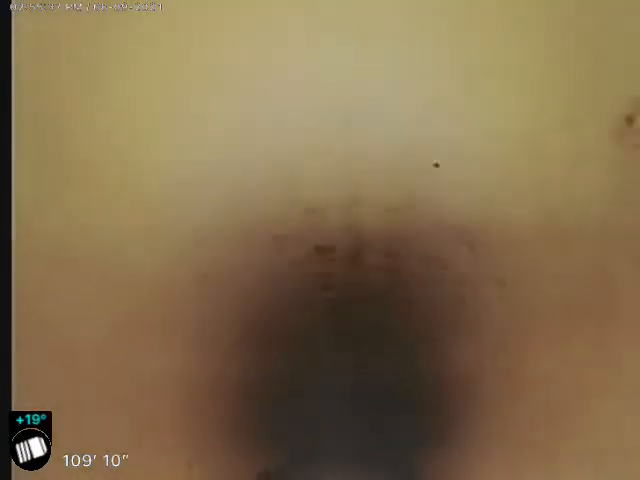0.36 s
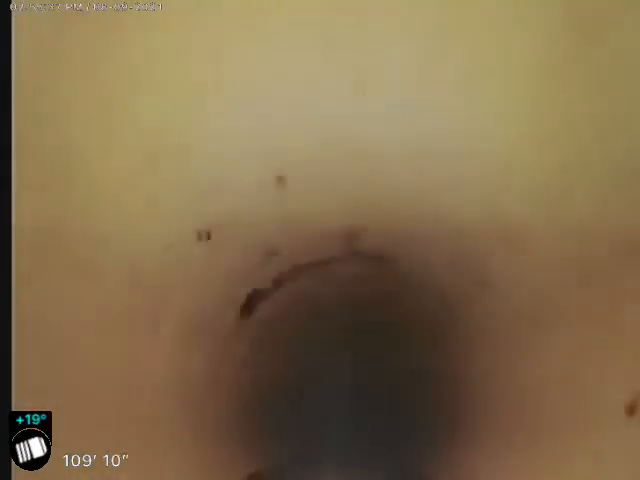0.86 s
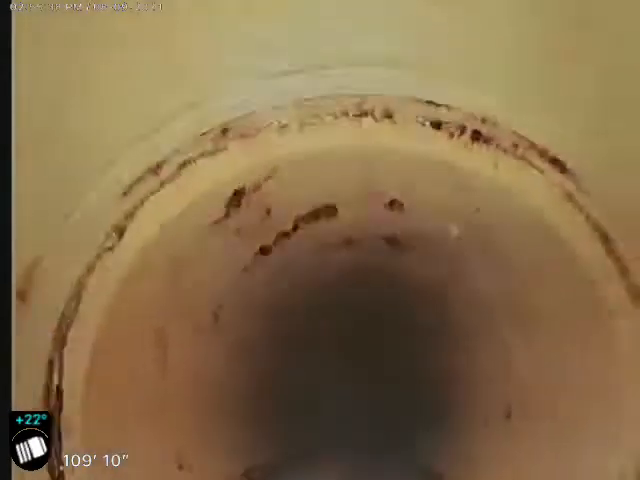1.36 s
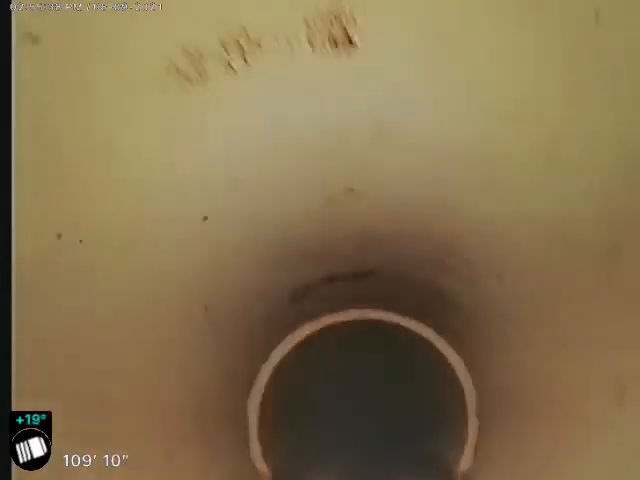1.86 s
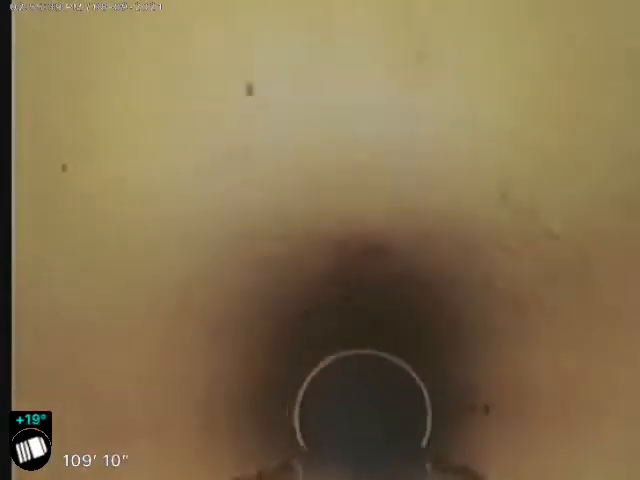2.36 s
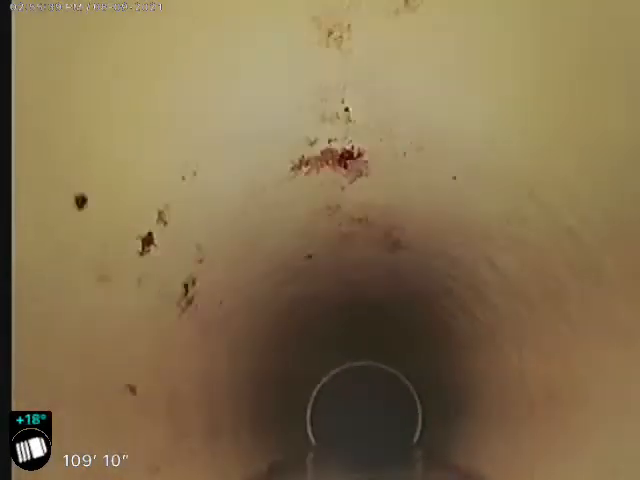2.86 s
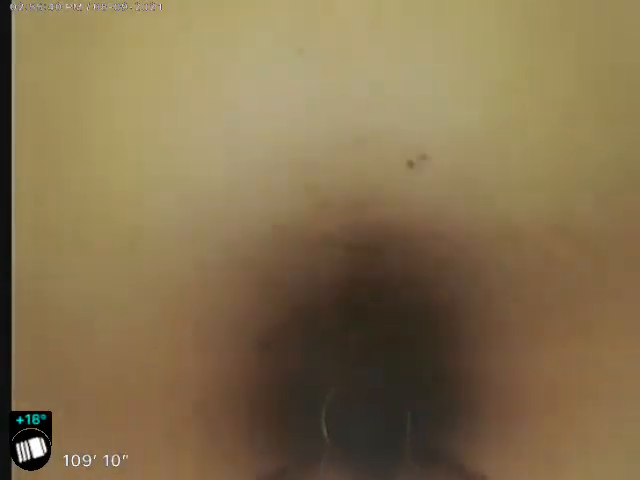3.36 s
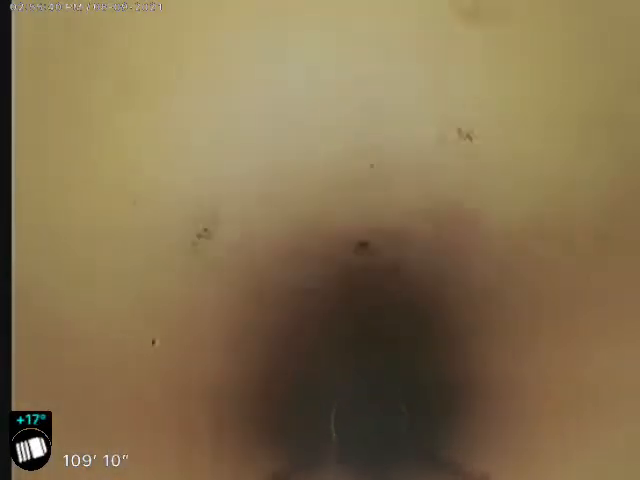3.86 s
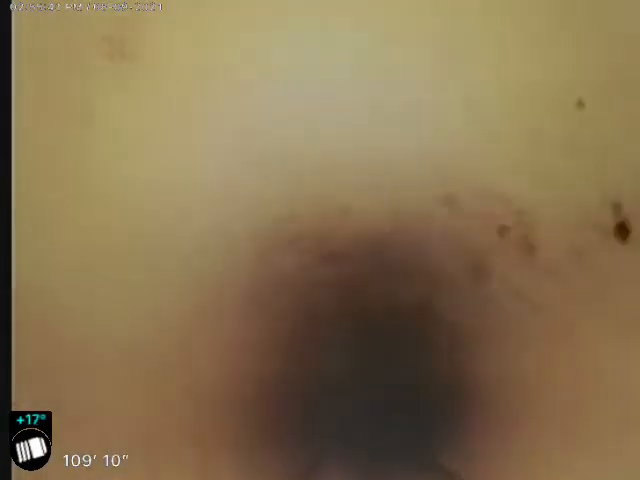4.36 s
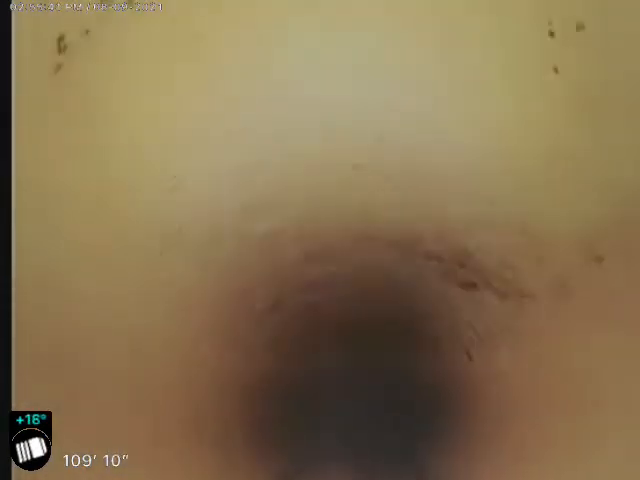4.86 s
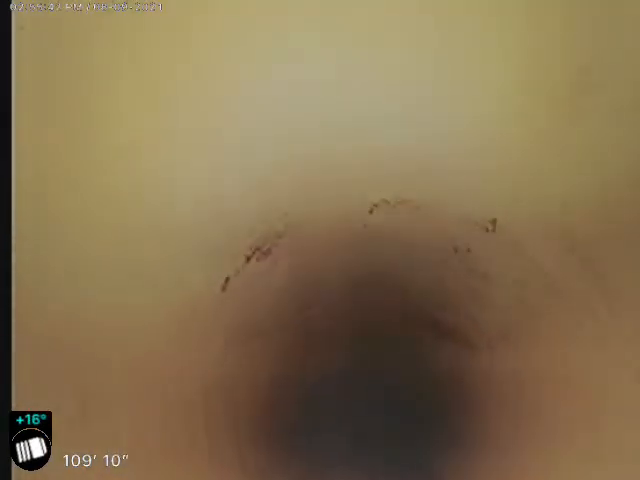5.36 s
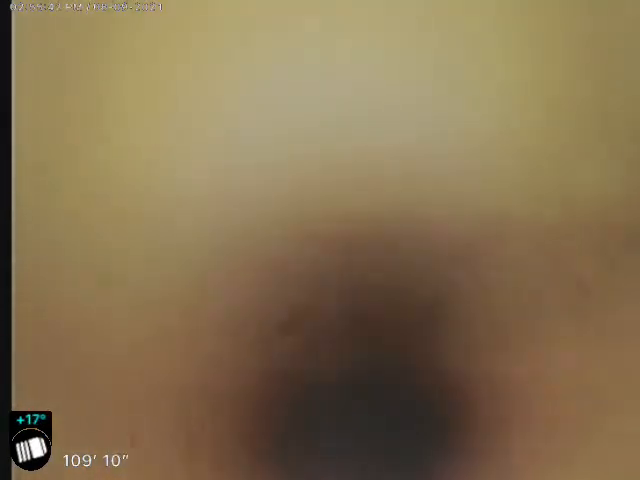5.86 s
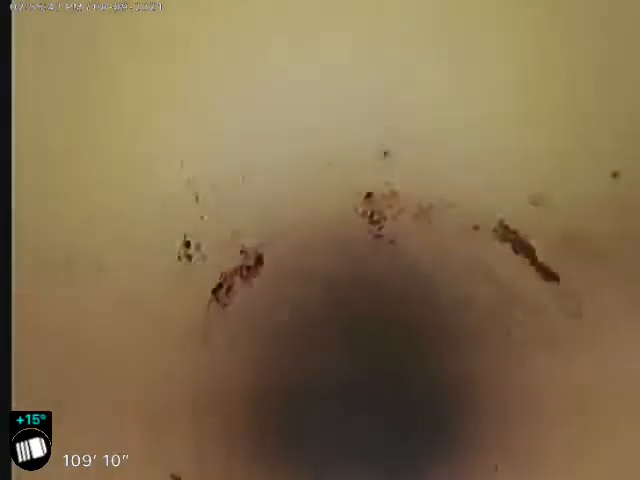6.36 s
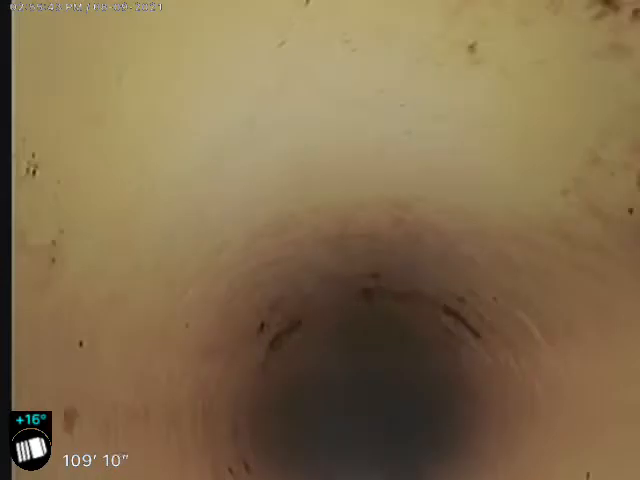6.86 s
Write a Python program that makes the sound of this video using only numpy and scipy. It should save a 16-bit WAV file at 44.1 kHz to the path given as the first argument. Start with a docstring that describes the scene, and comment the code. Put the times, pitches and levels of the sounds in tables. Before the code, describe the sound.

A four-cylinder engine runs at a fast, perfectly even idle close by, a loud low hum with airy roar, faint gear whine and light valve clatter.

```python
"""Close beside a four-cylinder engine at a fast, very even governed idle, on a small camera microphone.
Broad air noise roars in the bodywork and low noise rumbles in hollow modes; a pump drones on its own shaft.
Locked to the crank are the exhaust orders and gear whines, as sines, and valve clatter, as one repeated cycle.
A loose tappet rings once a cycle. Three times the recorder loses a sample and ticks."""
import sys
import numpy as np
from scipy import signal
from scipy.fft import rfft, irfft
from scipy.io import wavfile
from scipy.ndimage import map_coordinates

SR = 44100
rng = np.random.default_rng(int(sys.argv[2]) if len(sys.argv) > 2 else 0)


def decibels_to_gain(level_db):
    """Convert a level in decibels to a linear amplitude gain (20 dB per decade)."""
    exponent = np.asarray(level_db, float) / 20
    return 10 ** exponent


def int16_out(signal):
    """Quantize to a 16-bit WAV file."""
    q = np.round(np.clip(np.atleast_2d(signal).T, -1, 1) * 32767)
    wavfile.write(sys.argv[1], SR, q.astype(np.int16))


N = 308700
TIME = np.arange(N) / SR  # s
HZ = np.maximum(np.fft.rfftfreq(N, 1 / SR), 1)
CYCLE_HZ = 14.4196  # one cycle is two crank turns, four firings

# Air roar before the bodywork colours it: [f/Hz, level/dB per Hz]
AIR_ROAR = [(8, -67.5), (20, -65), (30, -58), (42, -50), (75, -48.5), (95, -56), (130, -57), (240, -64.5),
            (420, -69.5), (600, -70.5), (1000, -76.5), (1400, -79.5), (1700, -77), (2100, -81.5),
            (3000, -80), (4200, -85.5), (5500, -87), (6000, -91), (6500, -87), (6800, -87.5), (7200, -98)]
# Bodywork resonances and dips in the roar: [f/Hz, width/Hz, gain/dB]
BODY_MODES = [(41, 5, 4.5), (61.4, 3.9, -1.5), (69.4, 2.3, -2.5), (74, 6, 1.5), (86, 6.7, -3.5),
              (553.6, 21, 8.5), (96, 8.7, -5), (132, 9, -3.5), (275, 14, -6.5), (697, 44, 3.5),
              (816, 20, -11.5), (1195, 51, 7.5), (1360, 45, -3.5), (1990, 100, -1.5), (2350, 92, -4),
              (2910, 140, -9), (3230, 200, 2), (4600, 150, -3.5), (4830, 390, 3.5)]
# Hollow modes of the rumble in a low, a middle and a high group: [f/Hz, width/Hz, level within group/dB]
HOLLOW_MODES = [
    [(146.5, 10, -4), (165.4, 7.1, 3)],
    [(191.6, 11, 0), (209.9, 12, 1), (234.2, 11, -6.5)],
    [(294, 11, 1.5), (311.4, 10, -2), (332.4, 6.1, -3.5), (385.6, 10, 0.5), (409.8, 15, -1),
     (437, 37, -1.5), (457, 8.1, -4), (472.4, 5.8, 4.5), (496, 14, -6.5)],
]
# Rms of each hollow group before its swell: [level/dB]
HOLLOW_LEVELS = [-39, -39.5, -42.5]
# Swell of the low and middle hollow groups: [t/s, level/dB]
LOWER_SWELL = [(0, 2.5), (.35, -5.5), (1.15, -5.5), (1.67, 4), (2.2, -0.5), (2.999, -2.5), (3.3, 0),
               (4.1, 4.5), (4.6, -2), (5.22, 3.5), (5.9, -0.5), (6.299, 1.5), (7, -5.5)]
# Swell of the high hollow group: [t/s, level/dB]
HIGH_SWELL = [(0, 1), (.4, -3.5), (1.199, 1), (1.7, 2), (2.4, -2), (2.7, -1), (3.0, 1), (3.5, 2),
              (4.0, 3.5), (4.65, -1), (5.3, 3.5), (5.8, -2), (6.2, -1.5), (7, 0)]
# Pump drone partials: [multiple of the pump rate, rms level before wavering/dB]
PUMP_PARTIALS = [(1, -44.5), (2, -47.5), (3, -49.5)]
# Hardest tappet knocks: [cycle number from 0, starting level of the ring/dB]
HARD_TAPS = [(20, -34), (30, -33), (33, -31), (59, -35), (61, -32), (64, -35), (70, -30), (72, -35),
             (75, -33)]
# Valve knocks once a cycle: [lowest multiple, multiple above the highest, crank angle/rad, smear/rad]
VALVE_KNOCKS = [(105, 135, 2.54, 1.0), (235, 350, 3.6, 1.6)]
# Clatter that repeats every cycle: [f/Hz, mean rms level of one cycle harmonic/dB]
CLATTER_SPECTRUM = [(560, -68.5), (650, -67), (740, -66.5), (790, -73), (815, -86.5), (850, -72),
                    (970, -66), (1180, -68), (1350, -76), (1600, -72.5), (2100, -79), (2700, -73.5),
                    (3400, -79), (4100, -80), (5000, -87)]
# Gear and block tones locked to the crank: [multiple of the cycle, rms level before wavering and rise/dB]
GEAR_WHINES = [(41, -61.5), (44, -59.6), (46, -59.0), (47, -59.7), (48, -55.5), (49, -54.6), (50, -52.4),
               (60, -61.4), (64, -59.4), (69, -62.7), (76, -62.6), (83, -63.2), (84, -62.5), (95, -66.7),
               (112, -65.3), (113, -67.6), (118, -62.3), (120, -53.5), (123, -64.8), (128, -56.6),
               (130, -65.8), (133, -67.8), (154, -64.5), (156, -70.8), (162, -71.4), (172, -64.3),
               (180, -66.4), (181, -68.2), (188, -66.8), (200, -68.1), (208, -68.1), (211, -69.4),
               (215, -63.2), (216, -60.4), (219, -68.8), (220, -62.2), (224, -62.8), (225, -65.0),
               (226, -66.3), (227, -62.0), (232, -68.5), (240, -71.5), (255, -72), (260, -72.5), (283, -75)]
# Exhaust tones: [multiple of the cycle, rms level/dB]
EXHAUST_ORDERS = [(2, -52), (3, -44), (4, -16.0), (5, -36.5), (6, -55), (7, -50.5), (8, -37), (10, -46),
                  (11, -49), (12, -38), (14, -53), (15, -54), (16, -58.5), (17, -60.5), (18, -51.5),
                  (19, -67.5), (24, -56), (25, -55), (26, -60), (27, -64), (28, -55), (31, -62), (34, -60),
                  (35, -66), (36, -65.5), (37, -67), (38, -51.5), (40, -61.5)]
# Samples lost by the recorder: [t/s]
LOST_SAMPLES = [2.25839, 3.58200, 4.88238]


def colour(table, hz):
    """Level in dB from a (f/Hz, level/dB) table, straight on a log-frequency axis."""
    points, db = np.transpose(table)
    return np.interp(np.log(hz), np.log(points), db)


def noise(gain):
    """White noise of 0 dB per Hz through a spectral gain."""
    white = rfft(rng.standard_normal(N))
    return irfft(white * gain, N) * np.sqrt(SR / 2)


def walk(rate_hz):
    """Slow chance with spread 1, drawn 100 times a second and joined by straight lines."""
    count = N // 441
    slow = np.exp(-(np.fft.rfftfreq(count, N / count / SR) / rate_hz) ** 2)
    x = irfft(rfft(rng.standard_normal(count)) * slow, count)
    return np.interp(TIME, np.linspace(0, TIME[-1], count), (x - x.mean()) / np.std(x))


def tones(table, phase, start, waver_db, waver_hz):
    """Sines on multiples of a phase, each wavering in level by itself."""
    out = 0
    for (multiple, db), offset in zip(table, start):
        level = np.sqrt(2) * decibels_to_gain(db + waver_db * walk(waver_hz))
        out = out + level * np.cos(round(multiple) * phase + offset)
    return out


def roar(crank):
    """Broad air noise coloured by the bodywork; bands flicker alone and the upper ones pulse with the cycle."""
    body_db = sum(gain / (1 + (2 * (HZ - f) / width) ** 2) for f, width, gain in BODY_MODES)
    gain = decibels_to_gain(colour(AIR_ROAR, HZ) + body_db)
    half_octave = 2 * np.log2(HZ / 40)
    # firing, cycle and valve rates
    pulse_db = 0.32 * np.cos(4 * crank) + 0.34 * np.cos(crank) + 0.38 * np.cos(8 * crank)
    out = 0
    for band in range(-2, 17):
        share = np.cos(np.pi / 2 * np.clip(half_octave - band, -1, 1))
        upper = band > 8  # centred at 905 Hz and above
        flicker_db = (0.7 if upper else 0.9) * walk(1.9)
        out = out + noise(gain * share) * decibels_to_gain(flicker_db + upper * pulse_db)
    return out


def rumble():
    """Low noise ringing in hollow modes; the lower groups swell together, the high one apart; each flickers."""
    out = 0
    swells = [LOWER_SWELL, LOWER_SWELL, HIGH_SWELL]
    for modes, level_db, swell in zip(HOLLOW_MODES, HOLLOW_LEVELS, swells):
        power = sum(decibels_to_gain(2 * db) / (1 + (2 * (HZ - f) / width) ** 2) ** 2 for f, width, db in modes)
        ringing = noise(np.sqrt(power))
        swell_db = np.interp(TIME, *np.transpose(swell))
        flicker_db = 1.0 * walk(3.6)
        out = out + ringing / np.std(ringing) * decibels_to_gain(level_db + swell_db + flicker_db)
    return out


def pump():
    """A drone on its own shaft whose partials waver, each by itself."""
    shaft = 2 * np.pi * 184.4 * TIME  # pump rate in Hz
    start = rng.uniform(0, 2 * np.pi, len(PUMP_PARTIALS))
    return tones(PUMP_PARTIALS, shaft, start, waver_db=3.0, waver_hz=0.72)


def tappet():
    """A loose tappet: one short damped ring a cycle, each with its own strength and pitch."""
    first_s, ring_hz, t60_s = .0283, 1130, .028
    usual_db, scatter_db, pitch_scatter = -39, 3, .07
    hard = dict(HARD_TAPS)
    out, ring_time = np.zeros(N + SR), TIME[:SR // 20]
    chance = rng.standard_normal((int(TIME[-1] * CYCLE_HZ), 2))
    for cycle, (size, pitch) in enumerate(chance):
        db = hard.get(cycle, usual_db + scatter_db * size)
        hz = ring_hz * (1 + pitch_scatter * pitch)
        ring = decibels_to_gain(db - 60 * ring_time / t60_s) * np.sin(2 * np.pi * hz * ring_time)
        at = int((first_s + cycle / CYCLE_HZ) * SR)
        out[at:at + len(ring)] += ring
    return out[:N]


def knocking(multiples):
    """Start phases: random, but gathered round the crank angle of a valve knock where one rings."""
    k = np.asarray(multiples)
    start, spread = rng.uniform(0, 2 * np.pi, len(k)), rng.standard_normal(len(k))
    for low, high, angle, smear in VALVE_KNOCKS:
        start = np.where((k >= low) & (k < high), smear * spread - k * angle, start)
    return start


def clatter(crank):
    """One cycle of random ticks and knocks, read off by crank angle so it repeats, with a slow level waver."""
    k = np.arange(41, 350)  # multiples of the cycle
    lines = np.zeros(4097, complex)
    level = decibels_to_gain(colour(CLATTER_SPECTRUM, k * CYCLE_HZ) + 3.0 * rng.standard_normal(len(k)))
    lines[k] = np.sqrt(2) * level * np.exp(1j * knocking(k))
    lines[[multiple for multiple, db in GEAR_WHINES]] = 0  # those multiples belong to the whines
    size = 2 * (len(lines) - 1)
    cycle = irfft(lines) * size / 2
    place = crank / (2 * np.pi) * size % size
    return map_coordinates(cycle, [place], order=3, mode="grid-wrap") * decibels_to_gain(0.37 * walk(1.5))


def whine(crank):
    """Gear and block tones on crank multiples, wavering one by one; the upper ones slowly grow."""
    upper_from, rise_db_per_s = 200, 0.9  # whines above this multiple grow
    groups = []
    for high in (False, True):
        table = [row for row in GEAR_WHINES if (row[0] > upper_from) == high]
        start = knocking([multiple for multiple, db in table])
        groups.append(tones(table, crank, start, waver_db=1.7, waver_hz=0.5))
    lower, upper = groups
    return lower + upper * decibels_to_gain(rise_db_per_s * (TIME - TIME[-1] / 2))


def exhaust(crank):
    """Steady hum of the exhaust orders, with phases set by the pipe and silencer."""
    pipe_lead, below_lag = .55, 1.45  # rad; the lag is for each multiple under the firing rate
    # above the silencer's resonance the tones turn over, which flattens the crests of the hum
    start = [pipe_lead + np.pi * (k > 6) - below_lag * max(4 - k, 0) for k, db in EXHAUST_ORDERS]
    return tones(EXHAUST_ORDERS, crank, start, waver_db=0.0, waver_hz=3.0)


def engine(crank):
    """Clatter, whines and exhaust hum, all locked to the crank."""
    return clatter(crank) + whine(crank) + exhaust(crank)


def scene():
    """The roar, engine and clatter follow one crank angle, which drifts a hair under the governor."""
    start_rad, drift_rad = -.35, 0.0014
    crank = 2 * np.pi * CYCLE_HZ * TIME + start_rad + drift_rad * walk(0.48)
    return (roar(crank) + rumble() + pump() + tappet() + engine(crank))[None]


def low_pass(x):
    """Removes everything above the highest recorded frequency."""
    return signal.sosfilt(signal.butter(12, 7050, fs=SR, output="sos"), x)


def record(dry):
    """A lost sample pulls the wave to zero for one tick of the recorder's clock; its output filter rounds it."""
    clock_hz, filter_hz = 16000, (5700, 7400)  # the filter fades out between these two
    keep = 1
    for lost_s in LOST_SAMPLES:
        since = TIME - lost_s
        keep = keep - np.sinc(since * clock_hz) * np.exp(-(since / .0006) ** 2)
    fade = np.cos(np.pi / 2 * np.interp(HZ, filter_hz, [0, 1])) ** 2
    smooth = irfft(rfft(dry * keep) * fade, N)
    return low_pass(smooth)


dry = scene()
out = record(dry)
int16_out(out)
```